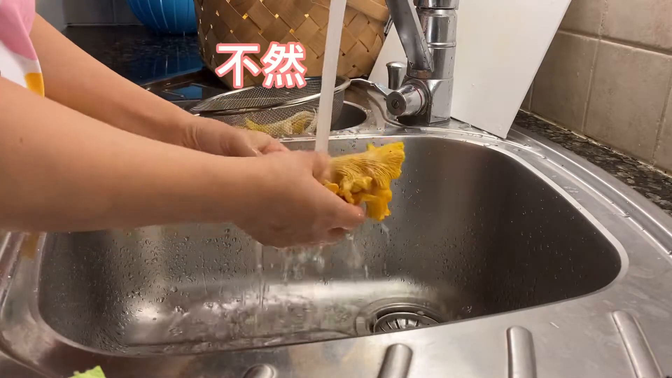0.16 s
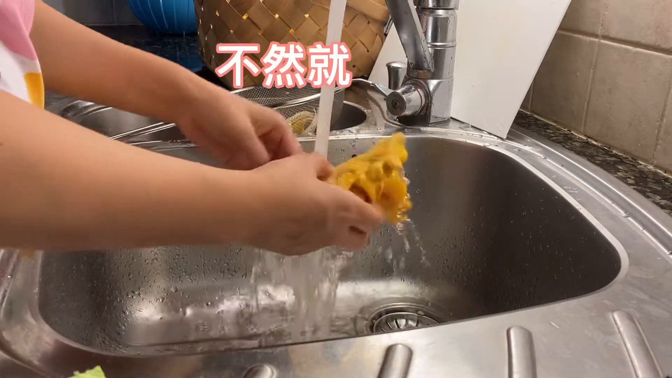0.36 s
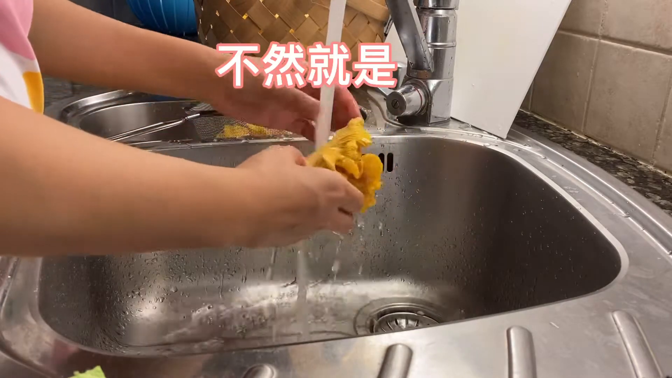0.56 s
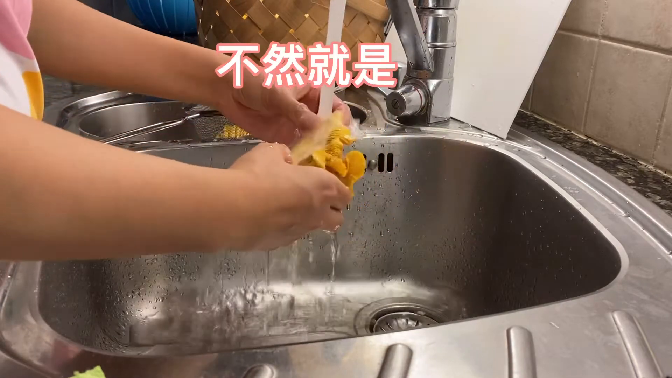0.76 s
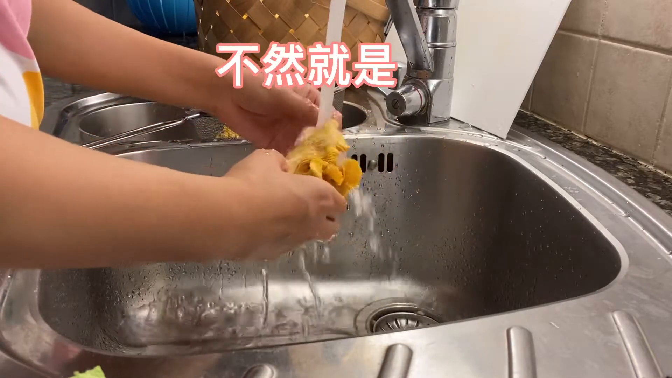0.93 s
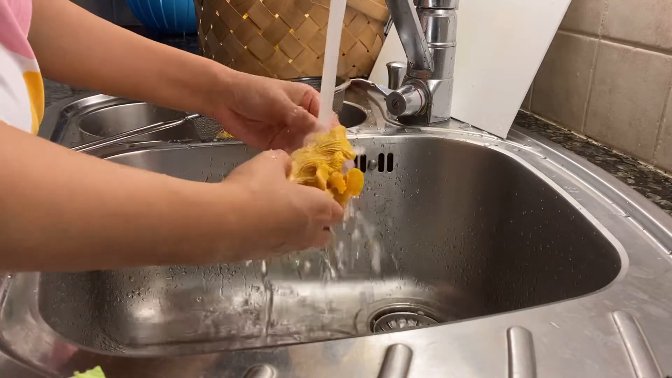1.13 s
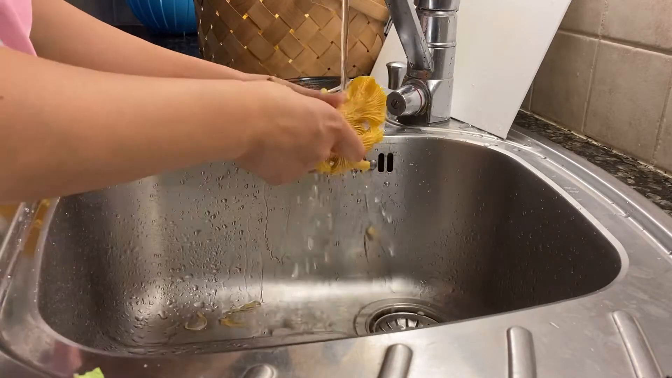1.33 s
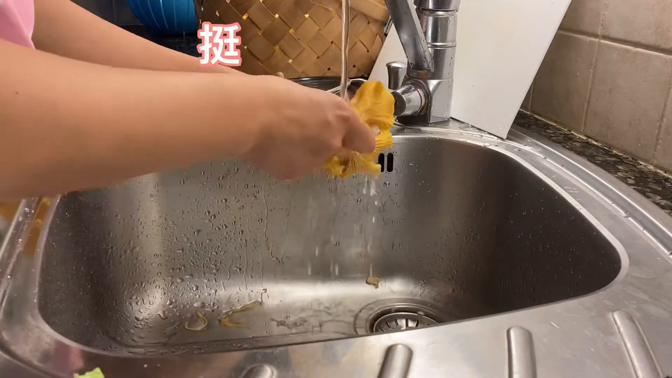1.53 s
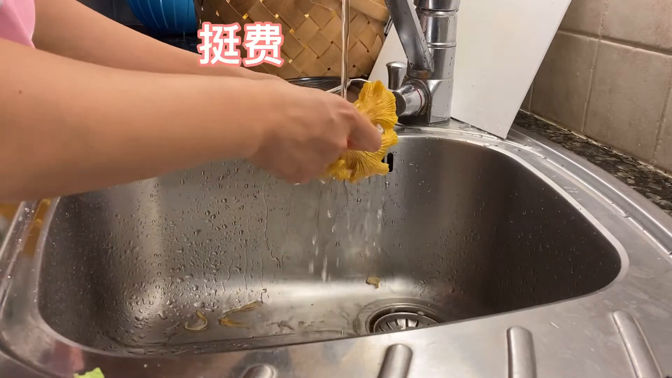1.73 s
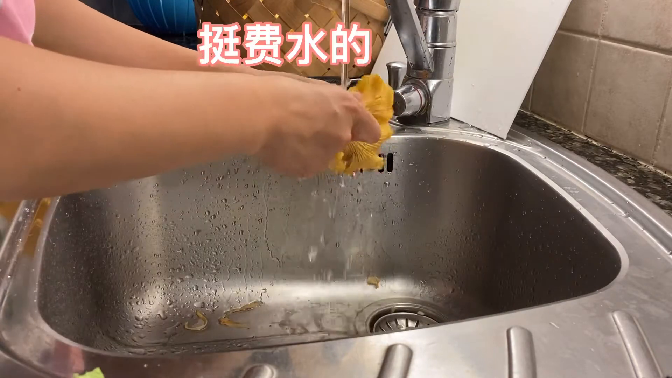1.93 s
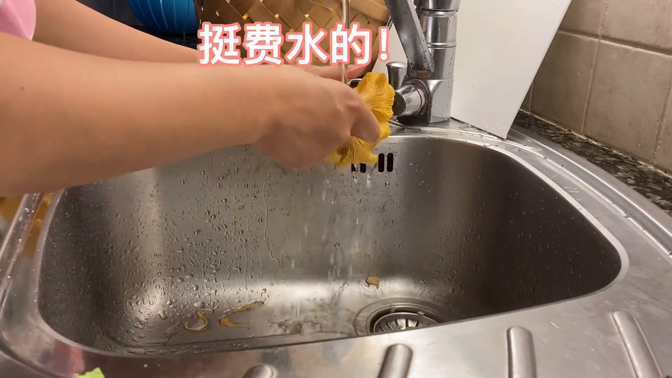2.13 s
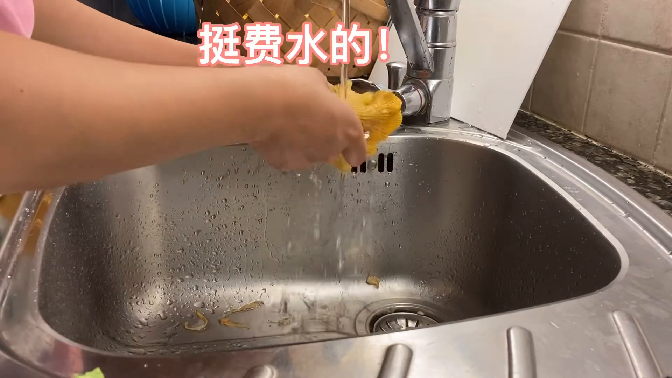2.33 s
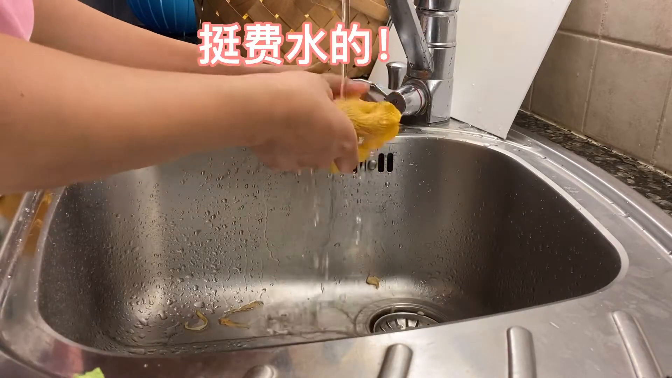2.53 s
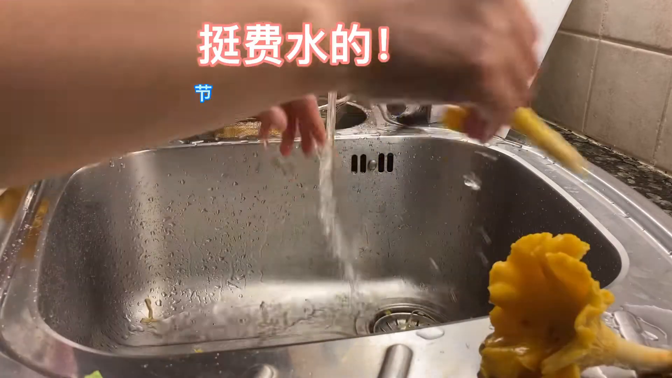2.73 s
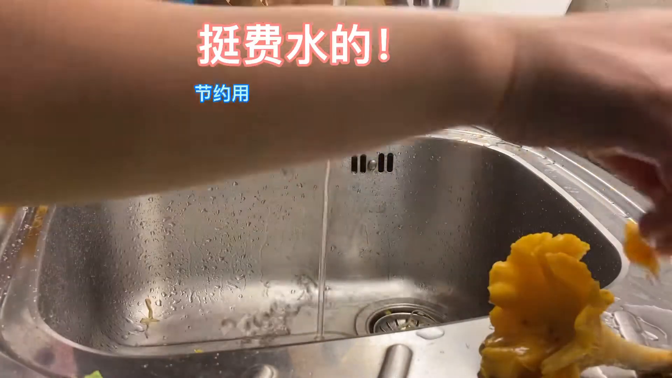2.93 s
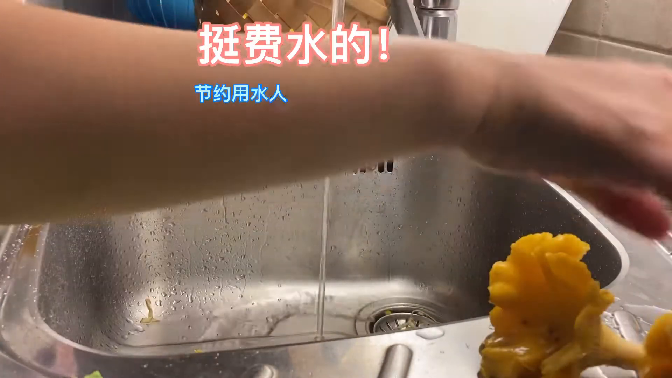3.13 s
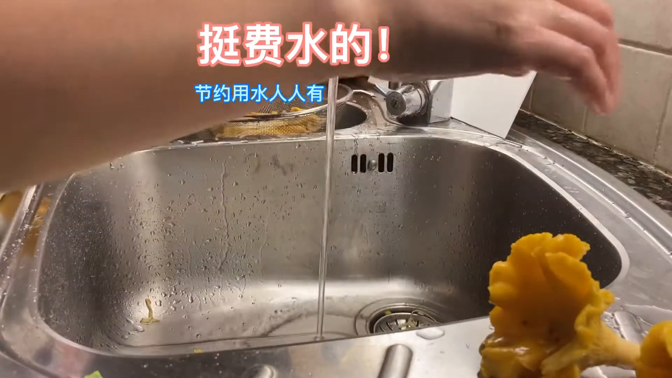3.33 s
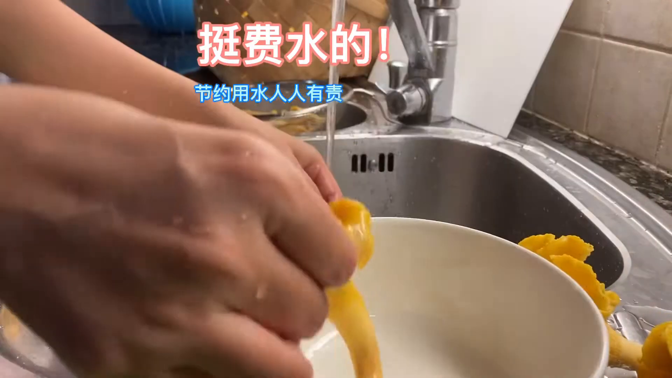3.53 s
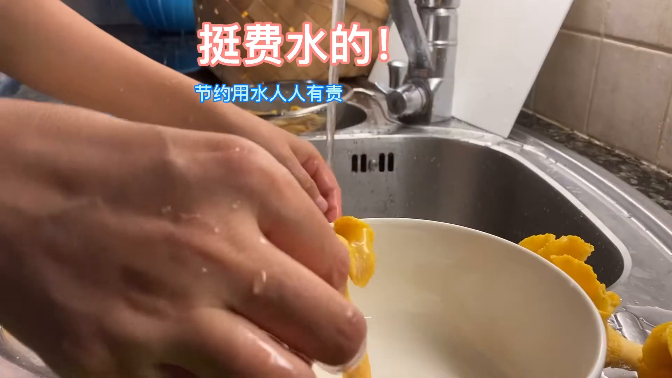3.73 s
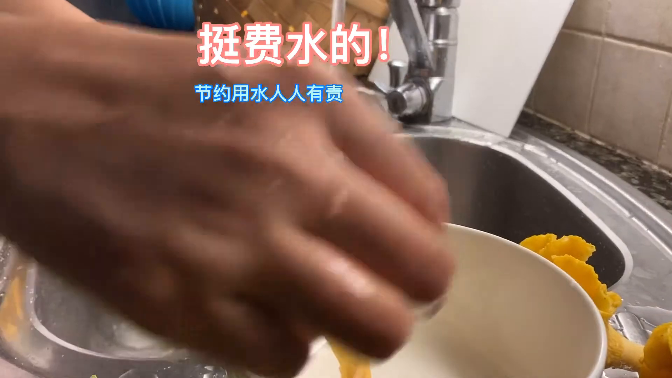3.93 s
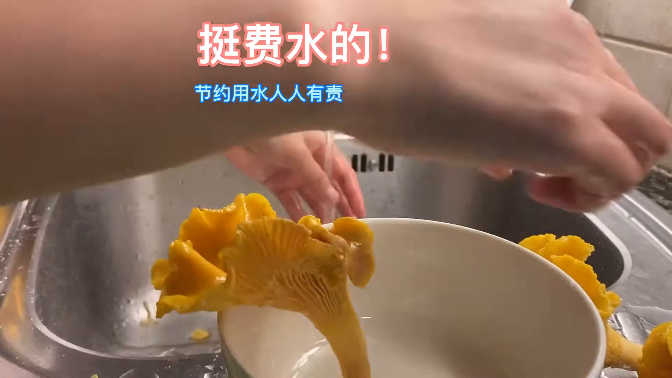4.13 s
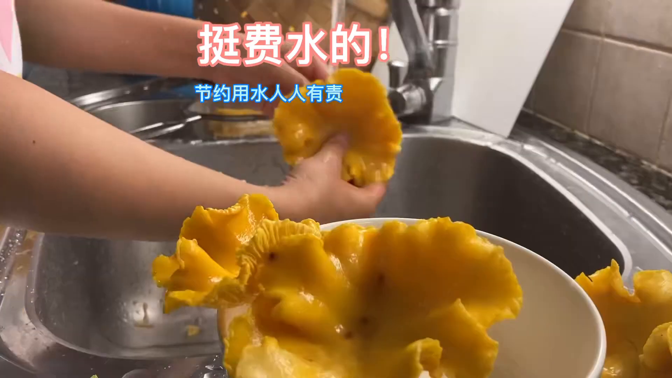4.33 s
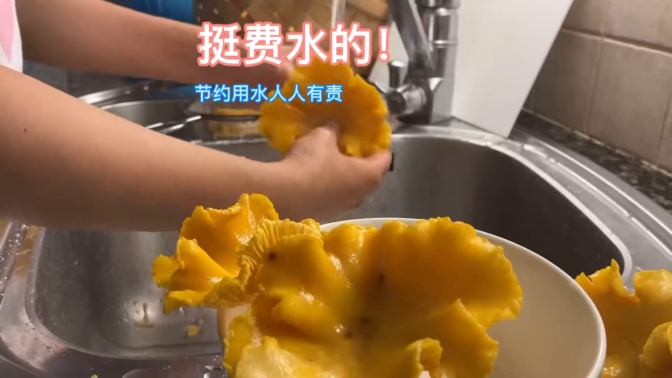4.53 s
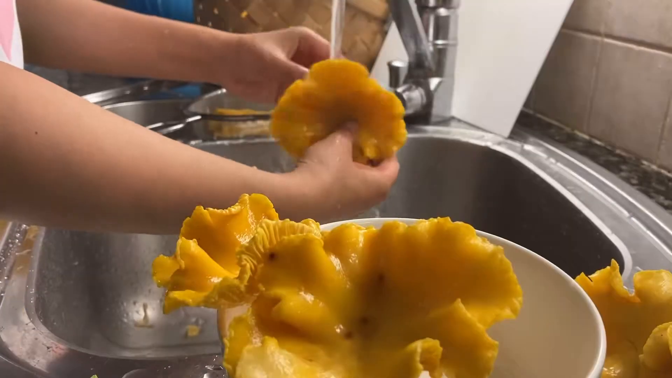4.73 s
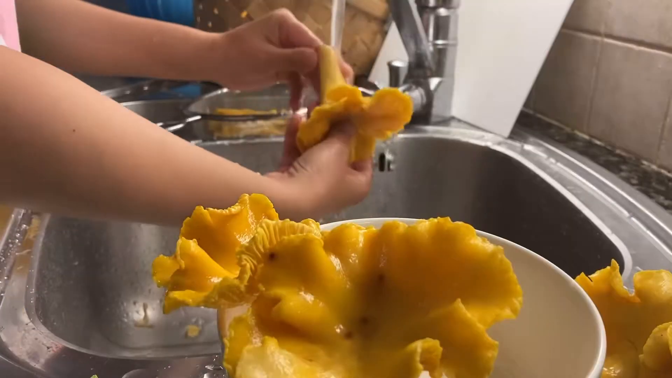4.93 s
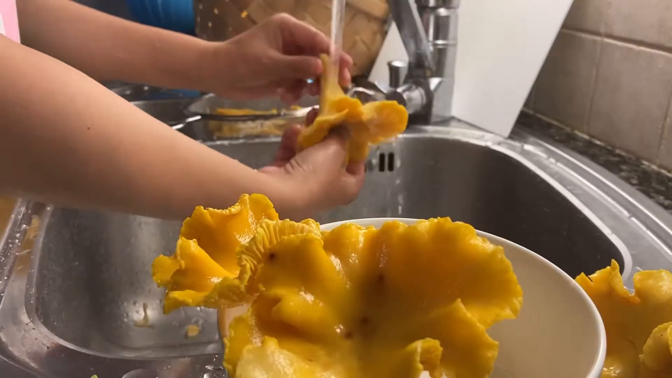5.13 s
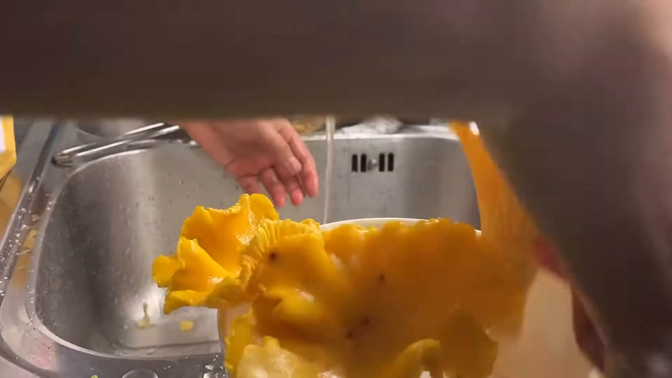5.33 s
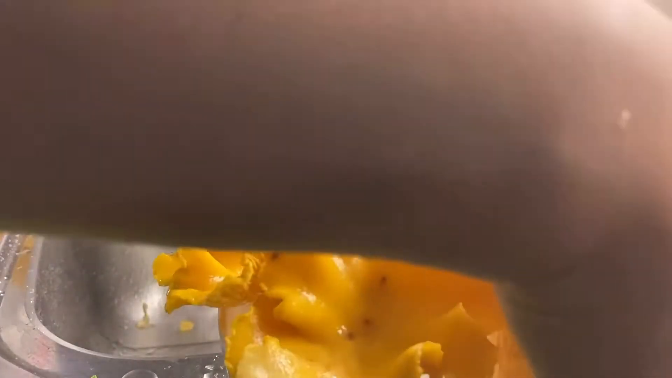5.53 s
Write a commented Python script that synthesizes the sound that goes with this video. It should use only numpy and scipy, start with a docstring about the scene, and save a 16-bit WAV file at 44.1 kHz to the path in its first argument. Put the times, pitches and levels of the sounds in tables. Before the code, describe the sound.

A kitchen tap runs hard over mushrooms in a steel sink, then cuts abruptly to a thin, quiet trickle with drips, plinks and soft knocks.

```python
"""At a kitchen sink of steel, a tap runs over hands and mushrooms: first wide open, then a thin stream.
The aerator hisses (filtered noise), spray crackles and run-off splashes (clouds of ringing bubbles),
and water drums on the sink floor (soft impulses through steel modes); single drops tick, plink and plop.
Later a bowl is set down in the sink with a soft thump, and water drums on it for a while.
Wet fingers squelch on the mushrooms over a quiet room tone; left and right microphone ports differ by a lag."""
import sys
import numpy as np
from scipy import signal
from scipy.fft import rfft, irfft, next_fast_len
from scipy.io import wavfile
from scipy.ndimage import map_coordinates

SR = 44100
rng = np.random.default_rng(int(sys.argv[2]) if len(sys.argv) > 2 else 0)


def int16_out(signal):
    """Quantize to a 16-bit WAV file."""
    q = np.round(np.clip(np.atleast_2d(signal).T, -1, 1) * 32767)
    wavfile.write(sys.argv[1], SR, q.astype(np.int16))


N = 245195


def amp(db):
    """Decibels to gain."""
    return np.exp(np.asarray(db) * np.log(10) / 20)


def unit(x):
    """Scale to rms 1."""
    return x / np.sqrt(np.mean(x ** 2) + 1e-20)


def along(points, hz):
    """Interpolate (Hz, value) points on a log frequency axis."""
    f, v = np.transpose(points)
    return np.interp(np.log(hz + 1), np.log(f + 1), v)


def curves(rows):
    """One value per sample for each column after the time."""
    s, *cols = np.transpose(rows)
    return [np.interp(np.arange(N) / SR, s, c) for c in cols]


def after(s):
    """A 6 ms fade from 0 to 1 centred on time s."""
    return np.clip((np.arange(N) / SR - s) / .006 + .5, 0, 1)


def swell(s, half):
    """A bell-shaped rise and fall around time s, down to 1/e at half seconds either side."""
    return np.exp(-np.minimum(np.square((np.arange(N) / SR - s) / half), 50))


def wobble(rate):
    """A smooth random curve, rate knots a second."""
    return map_coordinates(rng.standard_normal(int(N * rate / SR) + 4), [np.arange(N) * rate / SR])


def filtered(x, response):
    """x times a complex response of frequency."""
    m = next_fast_len(N + SR // 2)
    return irfft(rfft(x, m) * response(np.fft.rfftfreq(m, 1 / SR)), m)[..., :N]


def coloured(x, spectrum):
    """x through a (Hz, dB) tone filter, at rms 1."""
    return unit(filtered(x, lambda hz: amp(along(spectrum, hz))))


def resonance(f, modes):
    """Summed response of damped resonators, (Hz, width Hz, dB) each."""
    return sum(amp(db) * 1j * f * w / (c * c - f * f + 1j * f * w) for c, w, db in modes)


def resonate(x, modes):
    """x through resonances, thinned below 40 Hz, at rms 1."""
    return unit(filtered(x, lambda f: resonance(f, modes) * f ** 4 / (f ** 4 + 40 ** 4)))


# How alike left and right are for spray and other bright water: f/Hz, correlation [-1 to 1]
TREBLE_ALIKE = [(400, 1), (1300, 1), (2200, 0.043), (4000, 0.29), (5800, 0.29), (6600, 0.73), (9000, 1),
                (15000, 0.97)]
# The same for drumming, gurgling and the room: f/Hz, correlation [-1 to 1]
BASS_ALIKE = [(60, 0.93), (150, 0.96), (300, 0.85), (600, 0.45), (1200, 0.44), (8000, 0.27)]


def stereo(pair, alike):
    """Mix two unrelated signals to a left and right of given correlation."""
    turn = lambda hz: np.arccos(np.clip(along(alike, hz), -1, 1)) / 2
    mid, side = filtered(pair, lambda hz: np.array([np.cos(turn(hz)), np.sin(turn(hz))]))
    return np.array([mid + side, mid - side])


def add(track, s, sound):
    """Mix a sound into a track at time s."""
    part = track[..., max(round(s * SR), 0):][..., :sound.shape[-1]]
    part += sound[..., :part.shape[-1]]


def impacts(rate, spread_db):
    """Random droplet impulses, rate a second, of uneven size, in two unrelated directions."""
    hit = rng.random(N) < rate / SR
    size = amp(spread_db * np.clip(rng.standard_normal(N), -2, 2))
    return unit(hit * size * rng.standard_normal((2, N)))


# Decay of the kitchen's weak tail: f/Hz, time to fall 60 dB/s
TAIL_T60 = [(200, 0.28), (2000, 0.62), (7000, 0.25), (15000, 0.0093)]


def basin(x, near_t60, far_db):
    """Dense reflections off the steel walls, and the kitchen's tail at far_db re them."""
    hz, t, z = signal.stft(rng.standard_normal((2, SR // 4)), SR, nperseg=256)
    far = signal.istft(z * amp(-60 * t / along(TAIL_T60, hz)[:, None]), SR, nperseg=256)[1]
    near = rng.standard_normal(far.shape) * amp(-60 * np.arange(far.shape[1]) / SR / near_t60)
    answer = near / np.linalg.norm(near[0]) + amp(far_db) * far / np.linalg.norm(far[0])
    return signal.fftconvolve(np.atleast_2d(x), answer, axes=1)[:, :x.shape[-1]]


def bubble(t, hz, cycles, rise):
    """A bubble falls 60 dB in some cycles, its pitch rising by a fraction as it nears the surface."""
    age = t * hz / cycles
    return np.sin(2 * np.pi * hz * t * (1 + rise * age / 2)) * amp(-60 * age) * (1 - np.exp(-t * hz))


def bubbles(count, hz, octaves, cycles, spread_db):
    """A cloud of small bubbles at random times, each with its own strength in two directions."""
    when = rng.integers(0, N, (count, 1))
    pitch, size = np.clip(rng.standard_normal((count, 2)), -2, 2).T[:, :, None]
    bearing = 2 * np.pi * rng.random((count, 1))
    t = np.arange(int(SR * cycles / hz))
    rings = amp(spread_db * size) * bubble(t / SR, hz * 2 ** (octaves * pitch), cycles, rise=0.28)
    places = (when + t).ravel()
    cloud = np.array([np.bincount(places, (rings * way(bearing)).ravel(), N)[:N]
                      for way in (np.cos, np.sin)])
    return unit(cloud + basin(cloud, near_t60=.04, far_db=-4))


def drumming(rate, spread_db, modes):
    """Soft blows of falling water, with little push above 607 Hz, ring the modes of sink or bowl."""
    push = filtered(impacts(rate, spread_db), lambda hz: 1 / (1 + 1j * hz / 607) ** 2)
    return resonate(stereo(push, BASS_ALIKE), modes)


# Resonances of the air in the basin: f/Hz, width/Hz, level/dB
HOLLOW = [(422, 34, -1), (536, 46, -1), (672.5, 74, 0), (899, 76, -6.5), (1167, 80, -6.5), (1310, 113, -3),
          (1660, 940, -2)]


def gurgle(count):
    """Fat bubbles and splats in the puddle, coloured by the hollow of the basin."""
    fat = bubbles(count=count, hz=950, octaves=.6, cycles=15, spread_db=3.5)
    churn = fat + amp(-7) * impacts(rate=2500, spread_db=3)
    return resonate(stereo(churn, BASS_ALIKE), HOLLOW) * amp([[1], [-1]])  # left, right gain in dB


# The open jet breaking on the hands, spray before a fixed gain: t/s, level/dB
JET = [(0.0, -34.5), (0.205, -38.5), (0.24, -29.5), (0.385, -29.5), (0.46, -34.5), (0.7, -36), (0.745, -39),
       (0.91, -35), (1.14, -36.5)]
# Tone filter of the full spray: f/Hz, level/dB
FULL_SPRAY = [(1500, -17), (2800, -13.5), (3400, -11), (3650, -6.5), (4100, -7.5), (4700, -7), (5500, -7.5),
              (7000, -4), (8200, -1), (10000, 1), (12500, 0.5), (15500, -5)]
# Tone filter of splashing run-off, open tap and thin stream alike: f/Hz, level/dB
SPLASH = [(300, -28), (700, -33), (1000, -15), (1350, -17), (2000, 6), (3000, 12), (4000, 4), (6000, 11),
          (12000, -40)]
# Modes of the steel sink under drumming water: f/Hz, width/Hz, level/dB
SINK = [(55.5, 7.6, -15), (77, 16.6, -2.5), (106.1, 14.7, 2), (125.2, 8.9, -5.5), (166.4, 18, -1.5),
        (184, 6.5, -7), (229.5, 21, -17), (298, 10.5, -3.5), (402, 19, -23.5), (603, 20, -15.5)]


def full_tap():
    """The aerated jet breaks on the hands into surging spray; splash and drumming follow it."""
    spray_db, = curves(JET)
    splash_db = spray_db - 10
    # drumming follows the spray only faintly
    drum_db = -44 + 0.094 * (spray_db - np.mean([db for s, db in JET]))
    beads = bubbles(count=5000, hz=6200, octaves=.6, cycles=20, spread_db=4)
    mist = impacts(rate=8000, spread_db=1) + amp(-2.5) * beads
    surge = amp(spray_db + 2.5 + 0.93 * wobble(69.95))
    spray = surge * coloured(stereo(mist, TREBLE_ALIKE), FULL_SPRAY)
    froth = bubbles(count=3400, hz=2400, octaves=.7, cycles=12, spread_db=3.5)
    froth = froth + impacts(rate=450, spread_db=3.5)
    splash = amp(splash_db + 1.8 * wobble(45)) * coloured(stereo(froth, TREBLE_ALIKE), SPLASH)
    splash = splash * amp([[.7], [-.7]])
    drum = amp(drum_db) * drumming(rate=650, spread_db=2.5, modes=SINK) * amp([[-1.9], [1.9]])
    clear = bubbles(count=1100, hz=2900, octaves=.5, cycles=22, spread_db=3.5)
    ringing = amp(splash_db - 8) * stereo(clear, BASS_ALIKE)
    puddle = amp(splash_db - 4.5) * gurgle(count=2400)
    return spray + splash + ringing + puddle + drum


# Thin-stream water reaching the sink floor, before a fixed gain: t/s, level/dB
RUN_OFF = [(1.19, -53.5), (2.1, -54), (2.3, -52), (2.7, -56), (2.8, -61), (3.12, -67.5), (3.4, -52),
           (3.62, -50), (3.78, -67), (3.97, -54.5), (4.33, -59.5), (4.5, -49.5), (5.05, -52), (5.06, -60.5),
           (5.54, -62)]
# Droplets of the thin stream pattering on hands and steel: t/s, level/dB
PATTER = [(1.19, -71), (2.1, -59), (2.7, -53), (3.05, -59.5), (4.0, -51.5), (4.6, -57.5), (5.54, -54.5)]
# Tone filter of the aerator's fizz: f/Hz, level/dB
AERATOR = [(2500, -25), (4000, -9), (5500, -5.5), (7200, -4), (8200, 0), (10000, 2.5), (13000, 4),
           (15500, -3.5)]
# Tone filter of the thin patter: f/Hz, level/dB
THIN_SPRAY = [(2000, -13), (3300, 0.5), (3950, -5), (5400, -6), (7000, -8), (10000, 11), (15500, -17)]


def thin_stream():
    """The aerator fizzes and droplets patter; the run-off drums, gurgles and splashes in the sink."""
    drum_db, = curves(RUN_OFF)
    flow_db = drum_db - drum_db.mean()
    crackle = unit(basin(impacts(rate=80, spread_db=3.0), near_t60=0.088, far_db=6.5))
    hiss = rng.standard_normal((2, N)) + amp(2.5) * crackle
    fizz = amp(-48.5 + 0.36 * wobble(24.66)) * coloured(stereo(hiss, TREBLE_ALIKE), AERATOR)
    patter = bubbles(count=2000, hz=5800, octaves=.42, cycles=17, spread_db=4)
    patter = patter + amp(-3) * impacts(rate=450, spread_db=3.5)
    patter_db, = curves(PATTER)
    spray = amp(patter_db + 2 * wobble(55)) * coloured(stereo(patter, TREBLE_ALIKE), THIN_SPRAY)
    # splash and gurgle follow the run-off by a fraction of its dB
    froth = bubbles(count=3200, hz=1700, octaves=.7, cycles=16, spread_db=4.5)
    splash_db = -70 + 0.27 * flow_db + 0.45 * wobble(10)
    splash = amp(splash_db) * coloured(stereo(froth, TREBLE_ALIKE), SPLASH)
    puddle = amp(-60.5 + 0.61 * flow_db + 1.1 * wobble(20)) * gurgle(count=1600)
    drum = amp(drum_db + 2.7) * drumming(rate=400, spread_db=3, modes=SINK)
    return fizz + spray + splash + puddle + drum * amp([[-2.1], [2.1]])


# Gulps spilling from the hands: t/s, drumming level/dB, gurgle level/dB, half length/s
GULPS = [(0.293, -37, -66, 0.036), (0.403, -66, -65, 0.046), (0.719, -44.5, -48, 0.035),
         (0.967, -41.5, -46.5, 0.055), (1.112, -36, -56, 0.012), (1.766, -55, -55.5, 0.068),
         (2.313, -46, -88, 0.079), (2.701, -46, -58, 0.037), (3.527, -53, -53.5, 0.098),
         (3.957, -52, -64, 0.02), (4.51, -53, -78, 0.017), (4.674, -49, -72, 0.029),
         (4.856, -51, -62, 0.043)]


def gulps():
    """Water gathered in the hands spills at once, drumming on the steel and churning the puddle."""
    drum = drumming(rate=650, spread_db=1.5, modes=SINK) * amp([[-1.9], [1.9]])
    churn = gurgle(count=900)
    return sum(swell(s, half) * (amp(drum_db) * drum + amp(gurgle_db) * churn)
               for s, drum_db, gurgle_db, half in GULPS)


# Water poured off a mushroom into the puddle: t/s, level/dB, bubble f/Hz, half length/s
BUBBLINGS = [(0.95, -45.5, 1720, 0.028), (1.778, -59, 1210, .02), (3.531, -50, 1900, 0.026),
             (4.41, -61, 1530, 0.027), (4.486, -67, 910, 0.034), (4.573, -66, 1060, .02),
             (4.706, -56.5, 1200, 0.044), (4.76, -60.5, 1500, 0.034), (4.864, -54.5, 674, 0.068)]


def bubblings():
    """Short runs of ringing bubbles where a spill enters the puddle."""
    def run(hz):
        """Like-pitched bubbles spread over left and right."""
        return stereo(bubbles(count=450, hz=hz, octaves=.3, cycles=36, spread_db=2), BASS_ALIKE)
    return sum(amp(db) * swell(s, half) * run(hz) for s, db, hz, half in BUBBLINGS)


def trickle():
    """The unbroken stream bores in and traps a quick run of like-sized bubbles in the puddle."""
    run = bubbles(count=1100, hz=1415, octaves=.07, cycles=34, spread_db=4.5)
    peak_s, fade_s = 3.245, 0.04  # fade_s: time constant either side of the peak
    return amp(-45.5) * np.exp(-np.abs(np.arange(N) / SR - peak_s) / fade_s) * run


# The stream glancing off a hand: t/s, level/dB, half length/s
SPATTERS = [(1.805, -47.5, 0.041), (2.585, -41.5, 0.028), (2.658, -41.5, 0.02), (2.713, -35, 0.029),
            (2.803, -49.5, 0.072), (4.835, -44.5, 0.027)]
# Tone filter of those showers: f/Hz, level/dB
SPATTER_TONE = [(600, -25), (1500, -2.5), (2600, -6.5), (4000, -3), (7000, 5), (11000, 12), (15500, -2)]


def spatters():
    """Short showers of droplets when a hand crosses the stream."""
    level = sum(amp(db) * swell(s, half) for s, db, half in SPATTERS)
    beads = bubbles(count=1500, hz=4200, octaves=.6, cycles=18, spread_db=4)
    shower = impacts(rate=700, spread_db=3.5) + amp(2) * beads
    return level * coloured(stereo(shower, TREBLE_ALIKE), SPATTER_TONE)


# Drumming on the bowl, strongest while a mushroom is held above it: t/s, level/dB
BOWL_DRUM = [(3.5, -45), (3.75, -50.5), (4.3, -46), (4.5, -42), (4.75, -43.5), (4.98, -47.5), (5.05, -46.5)]
# Modes of the bowl: f/Hz, width/Hz, level/dB
BOWL = [(106.7, 7.2, 0), (169.8, 7.9, 10.5), (189.6, 9.4, 7.5), (246, 10, -12), (303, 8.3, -2),
        (658, 33, -8.5)]


def bowl():
    """Run-off drums on the bowl standing in the sink, ringing its own modes."""
    level_db, = curves(BOWL_DRUM)
    drum = drumming(rate=600, spread_db=0.5, modes=BOWL)
    sounding = after(3.48) * (1 - after(5.056))
    return drum * amp(level_db) * sounding * amp([[-2.5], [.3]])


def stray_drops(count):
    """Rows like those of DROPS: faint drops at random moments, -43 +/- 7 dB, about 9 kHz."""
    return [(u * N / SR, -43 + 7 * (2 * v - 1), 9000 * 2 ** ((w - .5) / 2))
            for u, v, w in rng.random((count, 3))]


# Drops bursting on steel and skin, before gain and filter: t/s, level/dB, f/Hz
DROPS = [(0.049, -22.5, 4640), (0.1605, -23.5, 8000), (0.221, -25, 7740), (0.538, -22.5, 5150),
         (0.5945, -26, 5450), (0.6705, -25.5, 4330), (0.8026, -26, 5100), (0.889, -23.5, 4740),
         (0.9587, -23.5, 6450), (1.169, -25, 11000), (1.269, -48, 5070), (1.3045, -30.5, 10400),
         (1.384, -45, 4120), (1.4767, -36, 6200), (1.512, -42, 4800), (1.571, -25.5, 10700),
         (1.7995, -37, 7540), (1.8341, -23.5, 11400), (1.8374, -46, 5860), (1.871, -39.5, 5400),
         (1.925, -36.5, 6260), (1.942, -27, 12440), (2.125, -47, 4600), (2.177, -36, 5400),
         (2.206, -27, 8800), (2.334, -10, 7200), (2.573, -30.5, 5630), (2.59, -38, 5600),
         (2.6357, -29, 8300), (2.655, -34, 6900), (2.6785, -33, 6820), (2.7114, -32, 2950),
         (2.717, -32, 5900), (2.793, -29.5, 9900), (3.1208, -29, 10900), (3.554, -42, 6070),
         (3.6045, -46, 4710), (3.622, -42, 4540), (3.8016, -38, 4240), (3.925, -34, 10000),
         (3.9996, -27, 10700), (4.096, -46, 3630), (4.1783, -34.5, 7260), (4.412, -29, 7240),
         (4.59, -40.5, 4860), (4.643, -35.5, 3800), (4.674, -32.5, 3980), (4.7021, -28, 11600),
         (4.9747, -34.5, 4200), (5.012, -41, 4160), (5.0823, -29.5, 9000), (5.395, -39.5, 3730),
         (5.4835, -36, 7850)]


def drops():
    """Each drop snaps and rings a tiny bubble; the basin scatters it."""
    out, t = np.zeros((2, N)), np.arange(SR // 10) / SR
    for s, db, hz in list(DROPS) + stray_drops(count=24):
        crack = .11 * np.diff(rng.standard_normal(len(t) + 1)) * amp(-60 * t / .002)
        snap = bubble(t, hz, cycles=10.3, rise=0.017) + crack
        tick = .6 * snap + basin(snap, near_t60=.026, far_db=-9)
        add(out, s, amp(db + 6.0) * tick / np.abs(tick).max())

    def small_source(hz):
        """So small a source radiates little bass; the extreme treble rolls off too."""
        return (1j * hz / (1j * hz + 2200)) ** 2 / np.sqrt(1 + (hz / 12500) ** 10)
    return filtered(stereo(out, TREBLE_ALIKE), small_source)


# Larger trapped bubbles, before a fixed reduction: t/s, level/dB, f/Hz
PLINKS = [(0.068, -25.5, 1830), (0.164, -25, 2010), (0.2384, -28, 2890), (0.274, -22, 3560),
          (0.3555, -26, 3630), (0.5354, -28, 2260), (0.559, -32.5, 1360), (0.694, -30.5, 1990),
          (0.9428, -32, 2150), (0.9942, -18.5, 2630), (1.477, -29.5, 4020), (2.2357, -32, 4640),
          (2.735, -17.5, 2380), (2.855, -39, 3600), (2.94, -37.5, 3580), (3.382, -30.5, 3070),
          (3.5132, -30.5, 1700), (4.399, -46, 1680), (4.751, -41, 1690)]


def plinks():
    """Larger bubbles trapped in the puddle and between the fingers ring longer and start softer."""
    out, t = np.zeros((2, N)), np.arange(SR // 10) / SR
    for s, db, hz in PLINKS:
        direct = bubble(t, hz, cycles=34, rise=.12) * (1 - np.exp(-t * hz / 3))
        ring = direct + amp(-3) * basin(direct, near_t60=.04, far_db=-22)
        add(out, s, amp(db - 3.5) * ring / np.abs(ring).max())
    return out


# Fat drips plopping into the puddle, before a fixed reduction: t/s, level/dB, f/Hz
PLOPS = [(0.975, -36, 710), (1.232, -42, 664), (1.683, -34.5, 708), (1.709, -38.5, 488), (1.775, -46, 1140),
         (1.809, -39, 660), (1.886, -39, 1167), (2.205, -43, 650), (2.333, -35.5, 670), (3.242, -39.5, 970),
         (4.0, -36, 726), (4.066, -39.5, 760), (4.156, -38.5, 670), (4.435, -39, 665), (4.512, -50, 696),
         (4.69, -39, 630), (4.704, -43, 990), (4.75, -39, 670), (4.87, -36.5, 490)]


def plops():
    """A fat drip splats on the puddle, ringing the hollow of the basin, and traps a low bubble."""
    rings, splats, t = np.zeros((2, N)), np.zeros(N), np.arange(SR // 10) / SR
    for s, db, hz in PLOPS:
        add(rings, s, amp(db - 7.0) * bubble(t, hz, cycles=49, rise=0.19))
        add(splats, s, amp(db - 10) * rng.standard_normal(len(t)) * amp(-60 * t / 0.11))
    hollow_splats = filtered(splats, lambda f: resonance(f, HOLLOW))
    return (rings + amp(6.5) * hollow_splats) * amp([[.8], [-.8]])


# Wet fingers squelching on the mushrooms: t/s, level/dB
SQUELCHES = [(1.39, -61), (3.385, -51.5), (3.616, -46.5), (3.808, -46), (3.95, -49), (4.07, -51),
             (4.34, -52.5), (4.66, -50), (4.99, -55), (5.15, -51), (5.39, -59)]
# Tone filter of the squelch: f/Hz, level/dB
SQUELCH_TONE = [(600, -21), (1800, -6), (3000, -0.5), (4000, 7.5), (5500, 4), (12000, -9), (15500, -22)]


def squelches():
    """Fingers press clusters of tiny bubbles out of the wet mushrooms."""
    level = sum(amp(db) * swell(s, half=0.023) for s, db in SQUELCHES)
    foam = bubbles(count=3500, hz=3700, octaves=.5, cycles=25, spread_db=3)
    foam = foam + amp(-3) * impacts(rate=1200, spread_db=4)
    return level * coloured(stereo(foam, TREBLE_ALIKE), SQUELCH_TONE)


# Soft knocks in the sink: t/s, ring peak level/dB, contact click level/dB re ring, rise time constant/s
KNOCKS = [(3.423, -36, -3, 0.027), (3.449, -26, -2, 0.0012), (3.461, -28, -24, 0.0016),
          (3.512, -44, -14, 0.0045), (4.003, -45.5, -4, 0.0036)]
# Modes they ring, each level varied at random by about 1 dB: f/Hz, level/dB, time to fall 60 dB/s
KNOCK_MODES = [(172, 3, 0.13), (215, -3, 0.059), (252, -1.5, 0.095), (322, -9, 0.094), (414, -0.5, 0.12),
               (490, 10, 0.026), (663, -11, 0.059), (768, -5, 0.055), (1068, -9.5, 0.082),
               (2270, -11, 0.14)]
# Tone filter of the wet crackle: f/Hz, level/dB
CRUNCH = [(400, -1), (900, -2), (2000, -1), (3600, -2), (4500, -17), (9000, -30)]


def knocks():
    """Soft blows ring the sink and what stands in it; the wet contact clicks and crackles."""
    out, t = np.zeros((2, N)), np.arange(SR // 2) / SR
    grit = coloured(stereo(impacts(rate=900, spread_db=3), BASS_ALIKE), CRUNCH)
    lowpass = signal.butter(2, 2800, fs=SR, output="sos")
    for s, db, click_db, rise in KNOCKS:
        ring = np.zeros(len(t))
        for hz, level, t60 in KNOCK_MODES:
            decay = amp(level + rng.normal(0, 1) - 60 * t / t60)
            ring += decay * np.sin(2 * np.pi * (hz * t + rng.random()))
        ring *= (1 - np.exp(-t / rise)) ** 2
        click = signal.sosfilt(lowpass, rng.standard_normal((2, len(t)))) * amp(-60 * t / 0.021)
        crunch = grit[:, round(s * SR):][:, :len(t)] * amp(-12 - 60 * t / 0.1)
        add(out, s, amp(db) * (ring / np.abs(ring).max() + amp(click_db) * (click + crunch)))
    return out


# Tones of the hollow thump, before its overall level: f/Hz, level/dB
THUMP_MODES = [(205, -4), (291, -0.5), (393, -13)]


def thump():
    """A hollow thump of a few low tones swells in the sink and stops short."""
    end_s, rise_s = 2.516, 0.024
    t = np.arange(N) / SR - end_s
    ring = sum(amp(db) * np.sin(2 * np.pi * (hz * t + rng.random())) for hz, db in THUMP_MODES)
    return amp(-39.5) * ring * np.exp(np.minimum(t, 0) / rise_s) * (1 - after(end_s))


# Spectrum of the quiet kitchen: f/Hz, level/dB
ROOM_TONE = [(25, -50), (40, -24), (55, -3.5), (110, 0.5), (200, -9), (450, -13), (800, -23), (1400, -27),
             (2500, -20.5), (8000, -54), (16000, -21.5)]


def room():
    """The quiet kitchen: steady noise, broad in stereo."""
    return amp(-55.5) * coloured(stereo(rng.standard_normal((2, N)), BASS_ALIKE), ROOM_TONE)


def scene():
    """The wide-open tap gives way at once, at a cut, to the thin stream; all else sounds over the room."""
    thin = after(1.156)
    tap = (1 - thin) * full_tap() + thin * thin_stream()
    spills = gulps() + bubblings() + trickle() + spatters() + bowl()
    single_drops = drops() + plinks() + plops()
    return tap + spills + single_drops + squelches() + knocks() + thump() + room()


# Instants where the level dips briefly to nothing: t/s
DIPS = [1.157, 3.359]
# Left microphone port behind the right: f/Hz, lag/s
PORT_LAG = [(600, 0), (1500, .000106), (2700, .000185), (4000, .00025), (5300, .000283), (6900, .00029),
            (9100, .000275), (11350, .000264), (15700, .000255)]


def record(dry):
    """Two momentary dips, the lag between the microphone ports and a band limit at 16050 Hz."""
    t = np.arange(N) / SR
    dips = np.prod([1 - np.exp(-((t - s) / .005) ** 4) for s in DIPS], axis=0)

    def microphone(hz):
        """Half the lag on each port, as opposite phase turns."""
        ports = np.exp(1j * np.pi * hz * along(PORT_LAG, hz) * np.array([[-1], [1]]))
        return ports * (hz < 16050)
    return filtered(dry * dips, microphone)


dry = scene()
out = record(dry)
int16_out(out)
```